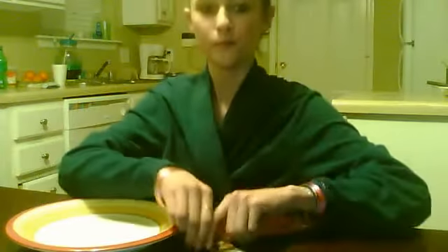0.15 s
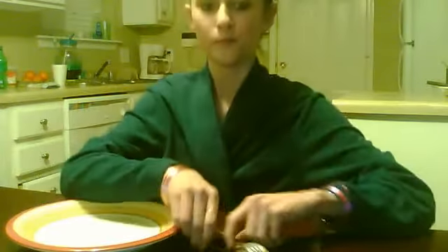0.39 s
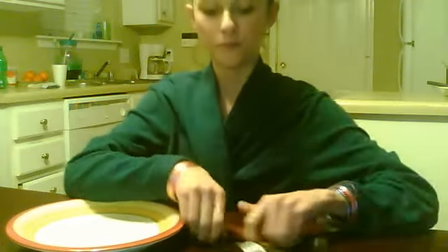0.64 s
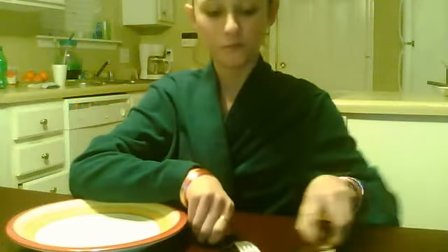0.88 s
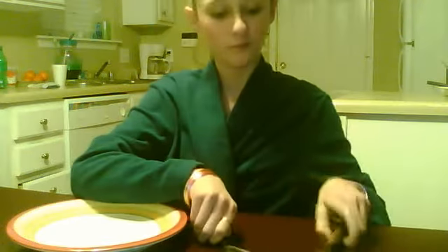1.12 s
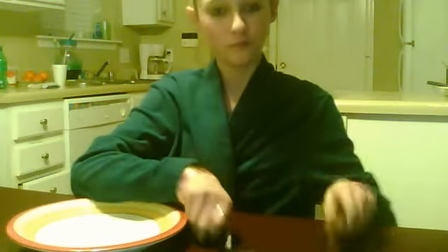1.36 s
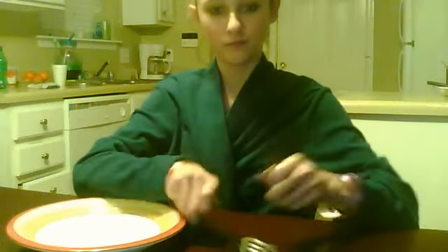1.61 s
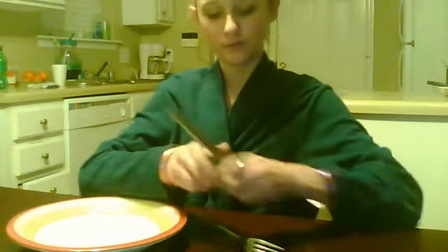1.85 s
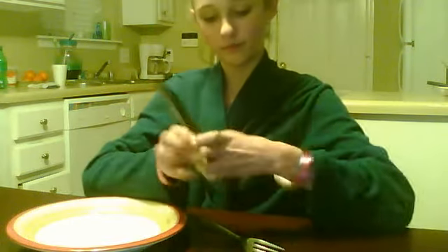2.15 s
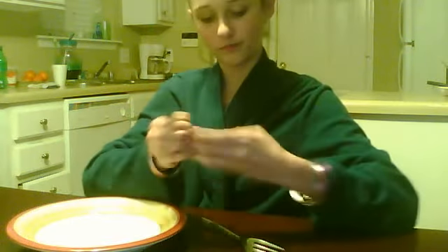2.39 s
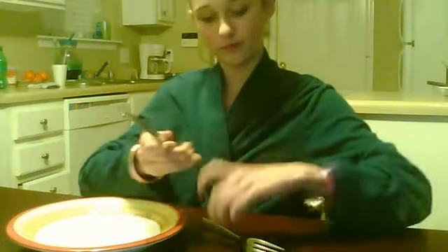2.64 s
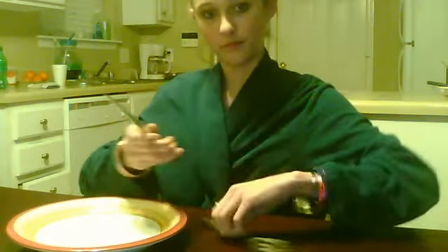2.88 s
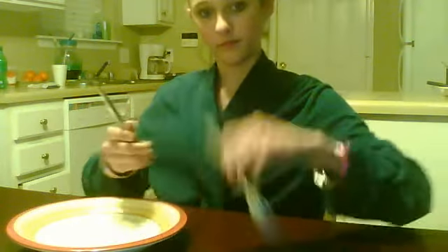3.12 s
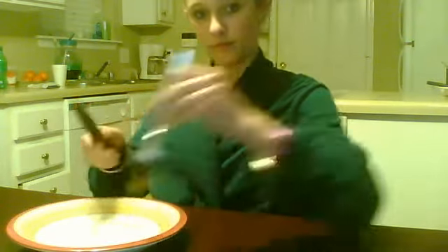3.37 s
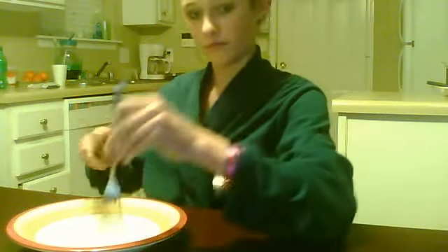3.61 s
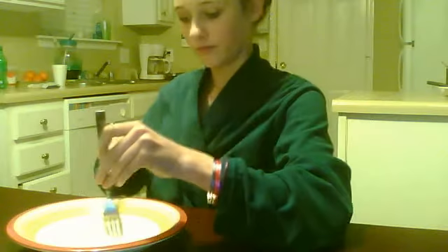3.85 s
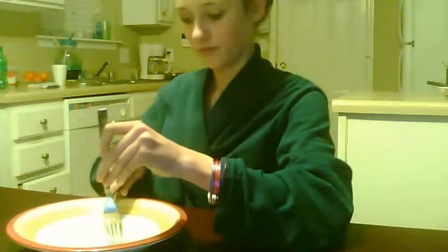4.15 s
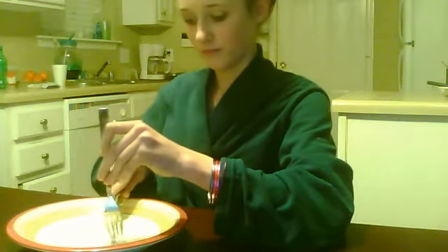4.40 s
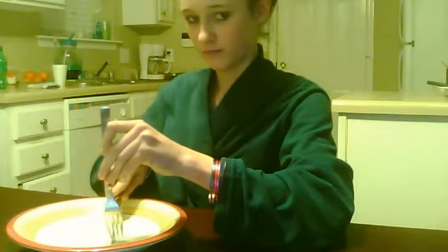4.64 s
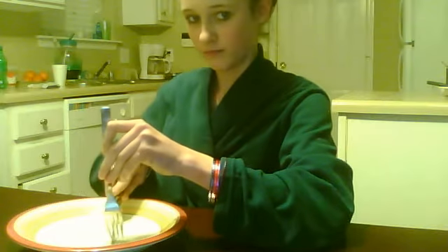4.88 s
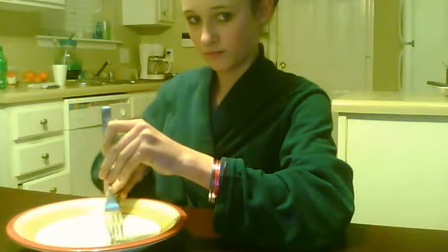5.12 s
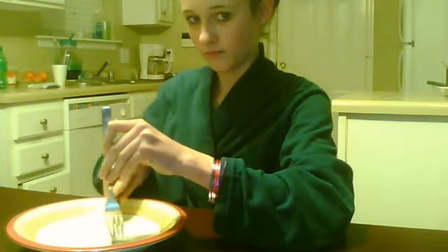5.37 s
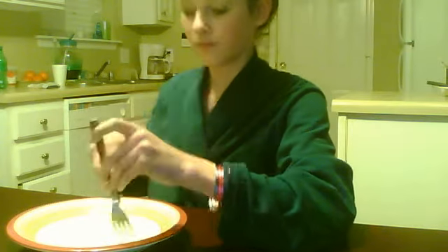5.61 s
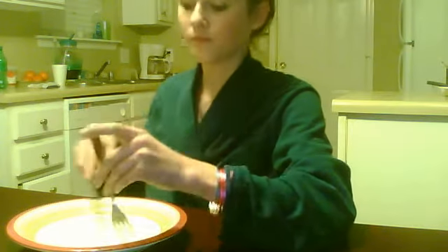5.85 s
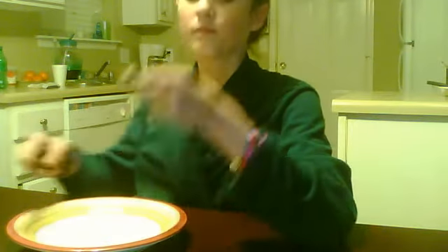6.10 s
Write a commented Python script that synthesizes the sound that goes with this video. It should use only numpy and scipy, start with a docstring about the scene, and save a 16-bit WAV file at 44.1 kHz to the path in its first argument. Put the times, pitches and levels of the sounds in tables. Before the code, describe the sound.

Cutlery shuffles, drops and drags loudly on a wooden kitchen table, then a fork lightly taps and squeaks on a ceramic bowl.

```python
"""Over a faint appliance hum, cutlery is shuffled, dropped and dragged on a wooden kitchen table;
then a fork taps and rubs a ceramic bowl. Impacts combine noise bursts in bands with decaying modes of
wood, steel and bowl. Random slips drive the rubbing sounds, and glided rough tones make the squeals.
The kitchen echo is a convolution with noise that dies away band by band."""
import sys
import numpy as np
from scipy import signal
from scipy.fft import rfft, irfft
from scipy.io import wavfile

SR = 44100
rng = np.random.default_rng(int(sys.argv[2]) if len(sys.argv) > 2 else 0)


def waveform_to_disk(signal):
    """Save audio, clipped to [-1, 1], as 16-bit WAV at the path in sys.argv[1]."""
    frames = np.transpose(np.atleast_2d(signal))
    scaled = np.clip(frames, -1, 1) * 32767
    samples = np.round(scaled).astype(np.int16)
    wavfile.write(sys.argv[1], SR, samples)


def nominal_scale(level):
    """Amplitude ratio for a level in decibels (scalar or array-like)."""
    x = np.asarray(level, float) / 20
    return 10 ** x


N = 275625  # length in samples


def rms_one(x):
    """Normalisation: scales a signal to rms 1."""
    return x / np.sqrt(np.mean(np.abs(x) ** 2) + 1e-20)


def at_hz(points, hz):
    """Interpolation of a spectrum on a log-frequency axis."""
    table_hz, value = np.transpose(points)
    return np.interp(np.log(hz), np.log(table_hz), value)


def band(x, low_hz, high_hz):
    """Band-pass filtering: keeps the range between two frequencies."""
    return signal.sosfilt(signal.butter(2, [low_hz, high_hz], "band", fs=SR, output="sos"), x + 1e-18)


def band_twice(x, low_hz, high_hz):
    """Cascaded filtering: a second pass steepens the skirts of the band."""
    return band(band(x, low_hz, high_hz), low_hz, high_hz)


def dull(x, cut_hz):
    """Soft contact excites little treble: a steep low-pass."""
    return signal.sosfilt(signal.butter(4, cut_hz, fs=SR, output="sos"), x + 1e-18)


def die_away(x, t60):
    """Exponential decay: each impulse falls by 60 dB in t60 seconds."""
    return signal.lfilter([1], [1, -nominal_scale(-60 / (t60 * SR))], x + 1e-18)


def ring(clicks, hz, t60):
    """Damped resonance: a unit click sets a decaying sine of initial height 1 ringing."""
    radius, angle = nominal_scale(-60 / (t60 * SR)), 2 * np.pi * hz / SR
    return signal.lfilter([0, np.sin(angle)], [1, -2 * radius * np.cos(angle), radius ** 2], clicks + 1e-18)


def strike(modes, times, blow_db, spread_db):
    """Modal excitation: every blow strikes every mode with a strength and sign of its own."""
    at, out = np.round(times * SR).astype(int), np.zeros(N)
    chance = rng.standard_normal((len(at), 2, len(modes)))
    for k, (hz, mode_db, t60) in enumerate(modes):
        strength = nominal_scale(blow_db + mode_db + spread_db * chance[:, 0, k])
        clicks = np.zeros(N)
        clicks[at] = strength * np.sign(chance[:, 1, k])
        out += ring(clicks, hz, t60)
    return out


def grains(per_s, uneven_db):
    """Dry friction: random tiny slips of uneven size, at rms 1."""
    sizes = nominal_scale(uneven_db * np.minimum(rng.exponential(1, N), 4)) * rng.choice([-1, 1], N)
    return rms_one(sizes * (rng.random(N) < per_s / SR))


def rubbed(modes, slips, damping):
    """Friction-driven resonance: contact scales the ring time by damping; unit rms gain on noise."""
    def resonate(x):
        return sum(nominal_scale(db) * ring(x, hz, t60 * damping) for hz, db, t60 in modes)

    return resonate(slips) / np.std(resonate(rng.standard_normal(SR // 2)))


def cracks(times, level_db, low_hz, high_hz, t60, click_db=-15.0):
    """Contact impulse: a click and a dying puff of noise, limited to a band."""
    at, clicks, puffs = np.round(times * SR).astype(int), np.zeros(N), np.zeros(N)
    clicks[at], puffs[at] = nominal_scale(level_db + click_db), nominal_scale(level_db)
    noise = die_away(puffs, t60) * rng.standard_normal(N)
    width = 2 * (high_hz - low_hz) / SR  # share of the spectrum, so that level does not follow bandwidth
    burst = clicks / width + 0.557 * noise / np.sqrt(width)
    return dull(band_twice(burst, low_hz, high_hz), 1.4 * high_hz)


def strokes(start, end, first_db, last_db, attack_s, release_s):
    """Amplitude envelope in dB: each stroke rises 40 dB, glides from first to last level, falls 40 dB."""
    t = np.arange(N) / SR
    levels = [np.interp(t, [a - attack_s, a, b, b + release_s], [u - 40, u, v, v - 40], -150, -150)
              for a, b, u, v in zip(start, end, first_db, last_db)]
    return np.max(levels, axis=0)


# spectrum shape of the room air: pitch_hz [Hz], level_db [dB per Hz, relative]
AIR = [(12, -19), (20, 3.5), (64, -10), (129, -12.5), (159, -5), (213, -14.5), (250, -9), (486, -17.5),
       (687, -19), (805, -19.5), (1700, -27), (1990, -33), (2210, -35), (7930, -40), (11500, -52),
       (15000, -82), (22000, -120)]
# appliance tones: pitch_hz [Hz], level_db [dB rms]
HUM = [(161.5, -78), (263.8, -83), (479.1, -80.5), (791.3, -77), (963.6, -82.5), (1206, -84), (1927, -83),
       (2568, -91.5), (3214, -92), (3531, -86.5), (3854, -89.5), (8000, -92)]


def room_tone():
    """Stationary noise and tones: coloured air noise and slightly wavering appliance tones."""
    hz = np.maximum(np.arange(N // 2 + 1) * SR / N, 1)
    air = irfft(rfft(rng.standard_normal(N)) * nominal_scale(at_hz(AIR, hz)), N)
    out = nominal_scale(-61) * rms_one(air)
    for tone_hz, db in HUM:
        wander = np.cumsum(rng.standard_normal(N)) * 0.012  # random walk of phase, radians
        out += np.sqrt(2) * nominal_scale(db) * np.sin(2 * np.pi * tone_hz * np.arange(N) / SR + wander)
    return out


# cutlery landing on the table: start_s [s], level_db [dB], and relative to it
# edge_db (hardness) [dB], glint_db (steel) [dB], hollow_db (hollow ring) [dB]
LANDINGS = [(0.02, -38, -25, -33, -12.5), (0.035, -47.5, -8, -16, -16), (0.04, -34.5, -21, -31, -4.5),
            (0.066, -24.5, -16.5, -29.5, -11.5), (0.116, -25, -17, -28.5, -17), (0.127, -30.5, -9, -30, -8),
            (0.173, -30.5, -20, -23.5, -11), (0.218, -37.5, -19, -26, -6), (0.251, -37, -22, -27, -8),
            (0.274, -27, -13.5, -20.5, -21), (0.33, -34, -28.5, -41, -0.5), (0.415, -45, -29, -24, -1),
            (0.444, -32, -16, -33, -9), (0.46, -19, -18.5, -42, -15.5), (0.532, -33.5, -34, -30.5, -3),
            (0.59, -41, -20, -31, -6), (0.659, -33, -26.5, -35.5, -1), (0.724, -41.5, -25, -29, -11),
            (0.748, -39, -25, -34, 0), (0.78, -41, -27.5, -41, 3), (0.789, -39.5, -29, -44, 1.5),
            (0.804, -35, -27.5, -32, -3.5), (0.811, -40, -25, -52, -1), (0.959, -27.5, -17, -55, -14.5),
            (0.966, -32, -25.5, -53.5, -12), (1.056, -22.5, -11, -42, -13), (1.063, -16, -10.5, -31, -16),
            (1.072, -6, -2.5, -42, -18.5), (1.09, -11.5, -9.5, -47.5, -21), (1.113, -17.5, -14, -46, -18),
            (1.385, -13.5, -14, -40.5, -21), (1.409, -25, -8.5, -44.5, -16.5), (1.425, -21, -6, -45, -16.5),
            (1.439, -25.5, -6, -46, -20), (1.454, -26, -6.5, -37, -18), (1.464, -31, -2.5, -36.5, -16),
            (1.484, -8.5, -2, -32.5, -13.5), (1.501, -11, -2.5, -39.5, -9.5),
            (1.518, -17.5, -3, -40.5, -15), (1.531, -21, -4, -39.5, -9), (1.554, -18, -10, -39.5, -10),
            (1.567, -19.5, -9, -20.5, -12), (1.578, -24, -10, -28, -8.5), (1.603, -9, -5, -41, -27),
            (1.618, -21, -8, -36, -19.5), (1.64, -14, -7, -36, -32), (1.653, -24, -9, -36, -19),
            (1.678, -26, -4, -30, -8), (1.691, -23, -3, -23.5, -25), (1.704, -21, -10, -43, -13),
            (1.739, -27, -6, -36, -19), (1.751, -31, -2, -25, -9), (1.778, -28, -9.5, -29, -9),
            (1.813, -32, -10, -34, -7), (3.018, -42.5, -10, -25, -27.5)]
# cutlery dragged over the wood: start_s [s], end_s [s], first_db [dB], last_db [dB],
# weight_db (boom relative to rub) [dB]
DRAGS = [(0.016, 0.136, -38.5, -31.5, -15.5), (0.164, 0.344, -42.5, -40.5, -22),
         (0.421, 0.65, -40.5, -42, -4), (0.652, 0.73, -37, -41.5, -22.5), (0.763, 0.8, -39, -36, -17.5),
         (0.81, 0.93, -35, -49, -24.5), (1.396, 1.478, -35, -43, -6), (1.544, 1.82, -29.5, -37.5, -14),
         (2.747, 2.896, -42.5, -34, -47)]
# table-top modes: pitch_hz [Hz], level_db [dB], t60_s (free ring) [s]
WOOD = [(523, -20, 0.26), (768, 5, 0.022), (975, -3.5, 0.064), (1107, 3, 0.04), (1237, 1, 0.035),
        (1398.5, -3, 0.081), (1470, -4, 0.06), (1640, -7.5, 0.055), (1950, -21, 0.086),
        (2107, -4.5, 0.02996), (2470, -3, 0.021), (3003, -24.5, 0.025)]
# low modes of the whole table: pitch_hz [Hz], level_db [dB], t60_s (free ring) [s]
BOOM = [(59, -10, 0.18), (110, -1.5, 0.24), (161.5, -6.5, .14), (214, 1.5, 0.15), (321, 4, 0.15)]
# the table's strongest pair of modes: pitch_hz [Hz], level_db [dB], t60_s (free ring) [s]
HOLLOW = [(608, 0, .15), (655, -5, .1)]


def drags():
    """Sliding friction: dense slips drive the wood, and each landing skids briefly."""
    attack_s, release_s = 0.034, 0.037
    skid_db, skid_t60_s = -10, 0.017
    lumps_db, lumps_hz = 3.2, 45  # the drag catches and lets go
    start, end, first, last, weight = np.transpose(DRAGS)
    rub = nominal_scale(strokes(start, end, first, last, attack_s, release_s))
    heavy = nominal_scale(strokes(start, end, first + weight, last + weight, attack_s, release_s))
    s, level = np.transpose(LANDINGS)[:2]
    landed = np.zeros(N)
    landed[np.round(s * SR).astype(int)] = nominal_scale(level + skid_db)
    skid = die_away(landed, skid_t60_s)
    lumps = rms_one(dull(rng.standard_normal(N), lumps_hz))
    grit = nominal_scale(-8 + lumps_db * lumps) * grains(per_s=1800, uneven_db=2.6)
    slips = np.maximum(rub, skid) * grit
    out = dull(rubbed(HOLLOW + WOOD, slips, damping=0.57), cut_hz=2740)
    out += nominal_scale(1.5) * dull(band(slips, low_hz=276, high_hz=1900), cut_hz=1660)
    out += dull(rubbed(BOOM[1:], heavy * grit, damping=1.0), cut_hz=390)
    return out + nominal_scale(-17) * band_twice(slips, low_hz=2431, high_hz=4630)


def knocks():
    """Impact: each landing cracks in four bands and strikes the wood modes."""
    s, level, hard, glint = np.transpose(LANDINGS)[:4]
    s = s + 0.0006  # the contact takes a moment to build
    treble = 9.5 + 0.6 * hard + 0.46 * glint  # the treble follows both edge and glint
    out = cracks(s, level - 5, low_hz=680, high_hz=1840, t60=0.026, click_db=-1.0 + 0.3 * hard)
    out += cracks(s, level + hard + 3.3, low_hz=1800, high_hz=2680, t60=0.018, click_db=-8.5 + 0.24 * hard)
    out += cracks(s, level + treble, low_hz=2600, high_hz=4280, t60=0.034, click_db=-9.0)
    out += cracks(s, level + glint - 1.5, low_hz=4600, high_hz=7800, t60=0.13, click_db=-16.5)
    # a soft landing puts more of its push into the wood
    return out + dull(strike(WOOD, s, level - 19 - 0.311 * hard, spread_db=4.5), cut_hz=2320)


def boom():
    """Low plate modes: each landing sets the whole table booming."""
    s, level = np.transpose(LANDINGS)[:2]
    blow = -31.5 + 0.62 * level  # the boom grows more slowly than the crack
    return dull(strike(BOOM, s, blow, spread_db=5.5), cut_hz=1700)


def hollow():
    """Modal excitation: each landing wakes the table's strongest pair of modes by a share of its own."""
    s, level, _, _, share = np.transpose(LANDINGS)
    return dull(strike(HOLLOW, s, level + share, spread_db=2), cut_hz=900)


# kitchen decay: pitch_hz [Hz], t60_s [s]
ECHO = [(100, 0.53), (1000, 0.5), (2000, 0.53), (3000, 0.47), (5000, 0.36), (9000, 0.18)]


def kitchen(x):
    """Reverberation: convolution with unit-energy noise dying away band by band after a brief build-up."""
    t, edges = np.arange(SR) / SR, 140 * 2 ** np.arange(0, 6.6, 0.5)
    tail = np.zeros(SR)
    for low_hz, high_hz in zip(edges, edges[1:]):
        t60 = at_hz(ECHO, np.sqrt(low_hz * high_hz))
        tail += band(rng.standard_normal(SR), low_hz, high_hz) * nominal_scale(-60 * t / t60)
    tail *= np.clip(t / 0.0031, 0, 1)
    return signal.fftconvolve(x, tail / np.sqrt(np.sum(tail ** 2)))[:N]


# short modes of tines and blade: pitch_hz [Hz], level_db [dB], t60_s [s]
TINES = [(2750, 4, 0.045), (3500, -0.5, 0.035), (4400, -6, 0.17), (4740, -6, 0.3), (5200, 0, .06),
         (5780, -3, .1), (6450, -1.5, .04)]
# steel clinking on steel: start_s [s], level_db [dB], pitch_hz (favoured) [Hz]
CLINKS = [(0.034, -47, 3500), (0.068, -52, 6450), (0.173, -48, 6450), (0.205, -56, 5780),
          (0.235, -61, 4400), (0.276, -58, 4400), (0.446, -47, 2750), (1.385, -52, 4740),
          (1.507, -52, 5780), (1.567, -46.5, 5200), (1.6, -47, 4740), (3.019, -59, 5200)]


def clinks():
    """Selective modal excitation: each clink rings the steel mostly near its favoured pitch."""
    s, blow, favoured = np.transpose(CLINKS)
    out = np.zeros(N)
    for mode in TINES:
        octaves_off = np.abs(np.log2(mode[0] / favoured))
        out += strike([mode], s, blow - 130 * octaves_off, spread_db=1)  # 130 dB per octave
    return out


# modes of the dropped knife: pitch_hz [Hz], level_db [dB], t60_s (before settling) [s]
KNIFE = [(1034, -22, .8), (1244, -12, .25), (1771, -18, .6), (1897, 0, 1.3), (2067, -17, .4),
         (2110, -19, .4)]
# the drop: start_s [s], level_db [dB], settle_s (time at which it settles on the wood) [s]
KNIFE_DROP = (1.0918, -32, 1.22)
# modes of the dragged fork: pitch_hz [Hz], level_db [dB], t60_s [s]
FORK = [(727, -6, .25), (950, -5, .9), (964, -7, .9), (1276, -8, .9), (1410, -4, .3), (1787, -10, .4),
        (1911, -4, .7)]
# the fork leaves the wood: start_s [s], level_db [dB]
FORK_LIFT = (1.74, -43)


def steel():
    """Bar modes and contact damping: the knife rings until it settles; the fork rings on as it lifts."""
    s, blow, settles = KNIFE_DROP
    flat_s = np.maximum(np.arange(N) / SR - settles, 0)
    settling = nominal_scale(-280 * flat_s)  # damping once the knife lies flat, dB per second
    knife = settling * strike(KNIFE, np.array([s]), blow, spread_db=1)
    s, blow = FORK_LIFT
    return dull(knife + strike(FORK, np.array([s]), blow, spread_db=1), cut_hz=3000)


# bands of the hiss: low_hz [Hz], high_hz [Hz], level_db [dB, relative]
EDGE = [(6700, 8300, 0), (9100, 10700, -2), (11770, 12000, -15)]
# blade edge on the varnish: start_s [s], end_s [s], first_db [dB], last_db [dB]
HISS = [(1.509, 1.538, -58, -60.5), (1.564, 1.638, -59.5, -59.5), (1.657, 1.803, -50, -67.5)]


def hiss():
    """Fine friction: the blade edge hisses in several treble bands."""
    fine = grains(per_s=8000, uneven_db=2.5)
    bands = [nominal_scale(db) * band_twice(fine, low_hz, high_hz) for low_hz, high_hz, db in EDGE]
    return nominal_scale(strokes(*np.transpose(HISS), attack_s=0.069, release_s=0.09)) * rms_one(sum(bands))


# the singing edge: start_s [s], end_s [s], first_db [dB], last_db [dB]
WHISTLE = [(1.685, 1.764, -55, -64)]


def whistle():
    """Narrow-band friction: the edge sings near 7.8 kHz."""
    fine = grains(per_s=8000, uneven_db=2.5)
    level = nominal_scale(strokes(*np.transpose(WHISTLE), attack_s=0.069, release_s=0.09))
    return level * rms_one(band_twice(fine, 7770, 7880))


# fork on the bowl: start_s [s], level_db [dB], and relative to it
# boom_db (table) [dB], upper_db (upper ring) [dB], knock_db [dB]
TAPS = [(3.8076, -53.5, 4.5, -2, 2), (3.8351, -55, 6.5, -1.5, -4), (4.008, -41, -14.5, 2, 3),
        (4.1398, -64, -4, -6, 8), (5.284, -70, -5.5, 6.5, 10), (5.386, -62.5, -10, 4, 18),
        (5.565, -52, 4, -3, -6), (5.594, -63, 14.5, 3, -12)]


def taps():
    """Impact through the bowl: each tap knocks and pushes the table."""
    s, level, push, upper, knock = np.transpose(TAPS)
    held = [(hz, db, t60 * 0.9) for hz, db, t60 in BOOM]  # resting forearms shorten the ring
    out = dull(strike(held, s, level + push + 0.94, spread_db=9.0), cut_hz=260)
    out += cracks(s, level + push + 0.25, low_hz=43.0, high_hz=95.0, t60=0.31)  # the table leg thuds
    out += cracks(s, level + knock, low_hz=201, high_hz=2210, t60=0.088)
    return out + cracks(s, level + upper - 12, low_hz=2800, high_hz=8400, t60=0.29, click_db=-18)


# bowl modes: pitch_hz [Hz], level_db [dB], t60_s (free ring) [s]
BOWL = [(1330, -7, 0.7), (1405, 4.5, 0.33), (1370, 2, 0.14), (1740, -8, 0.086), (2108, -8, 0.51),
        (2290, 5.5, 0.38), (2315, -4, 0.61), (2450, 2.5, 0.27), (2550, -6, 0.13), (2680, -17, 0.29),
        (3617, -1, 0.098), (3610, -12.5, 0.31), (5580, -11, 0.1), (5807, -16, 0.31), (6295, -21, 0.26),
        (7200, -11, 0.19), (8680, -15.5, 0.14), (9230, -23, 0.33)]


def bowl_ring():
    """Shell modes: how heavily a tap lands favours some modes; the resting tines make them waver."""
    s, level, push, upper, _ = np.transpose(TAPS)
    low = 0.1 * push  # the rings near 1.4 and 3.6 kHz
    ping = -5 + 0.82 * push  # a heavy landing wakes the rings near 1.7 and 5.8 kHz
    middle = -17 - 0.49 * push  # and damps the middle ring
    groups = [(BOWL[:3], -9.5 + low), (BOWL[3:4], ping), (BOWL[4:8], middle), (BOWL[8:10], -6.5),
              (BOWL[10:12], upper - 3 + low), (BOWL[12:14], upper + ping), (BOWL[14:], upper - 9)]
    out = np.zeros(N)
    for modes, share_db in groups:
        waver = rms_one(dull(rng.standard_normal(N), cut_hz=55))
        out += nominal_scale(4.0 * waver) * strike(modes, s, level + share_db, spread_db=1)
    return out


# tines rubbing the glaze: start_s [s], end_s [s], level_db [dB]
RUB = [(4.14, 4.184, -68), (4.23, 4.546, -79), (4.673, 4.692, -76), (4.84, 4.871, -72), (5.013, 5.05, -72),
       (5.163, 5.276, -72), (5.372, 5.396, -69), (5.428, 5.487, -64)]


def bowl_rub():
    """Sliding friction: the tines excite damped bowl modes and scratch the glaze."""
    start, end, level = np.transpose(RUB)
    rub = strokes(start, end, level, level, attack_s=0.18, release_s=0.12)
    out = rubbed(BOWL, nominal_scale(rub + 3) * grains(per_s=1100, uneven_db=4.0), damping=0.17)
    scratch = rms_one(band(grains(per_s=2500, uneven_db=5.0), low_hz=2880, high_hz=5940))
    return out + nominal_scale(rub - 11.5) * scratch


# a tine sticks and slips: start_s [s], end_s [s], level_db [dB], first_hz [Hz], last_hz [Hz]
SQUEALS = [(4.3, 4.68, -89, 2485, 2608), (4.67, 4.72, -81, 2345, 2310), (4.82, 4.92, -86.5, 2320, 2320),
           (5.0, 5.03, -66, 975, 943), (5.0, 5.08, -77, 2582, 2650), (5.16, 5.3, -74, 2010, 1970),
           (5.17, 5.22, -71.5, 850, 923), (5.22, 5.28, -63.5, 960.6, 1015), (5.2, 5.28, -87, 2316, 2350),
           (5.22, 5.27, -72, 2733, 2610), (5.39, 5.55, -65.5, 2460, 2255), (5.39, 5.52, -69.5, 2187, 2015)]


def squeals():
    """Stick-slip of a tine: narrow-band roughness modulates gliding tones."""
    fade_s, width_hz = 0.07, 40
    parts = [dull(grains(per_s=610, uneven_db=3.5), width_hz) for _ in range(2)]
    rough = rms_one(parts[0] + 1j * parts[1])
    t, out = np.arange(N) / SR, np.zeros(N)
    for k, (start, end, db, first_hz, last_hz) in enumerate(SQUEALS):
        phase = 2 * np.pi * np.cumsum(np.interp(t, [start, end], [first_hz, last_hz])) / SR
        level = nominal_scale(strokes([start], [end], [db], [db], fade_s, fade_s))
        shifted = np.roll(rough, k * SR // 3)  # gives each squeal another stretch of roughness
        out += level * np.sqrt(2) * np.real(shifted * np.exp(1j * phase))
    return out


def scene():
    """Superposition: contacts, echo and room tone; long rings feed the room less than knocks."""
    near = drags() + knocks() + hiss() + whistle() + taps() + bowl_rub() + squeals()
    rings = boom() + clinks() + bowl_ring()
    held = hollow() + steel()
    echo = nominal_scale(-11.5) * kitchen(near + nominal_scale(-4.5) * rings + nominal_scale(-12) * held)
    return (near + rings + held + echo + room_tone())[None]


def low_pass(x):
    """Removes everything above the highest recorded frequency."""
    return signal.sosfilt(signal.butter(12, 12050, fs=SR, output="sos"), x)


def record(dry):
    """Saturation and band limiting: peaks are rounded, then the treble is cut."""
    rounded = 0.75 * np.tanh(dry / 0.75)
    mix = signal.sosfilt(signal.butter(6, 11800, fs=SR, output="sos"), rounded)
    return low_pass(mix)


dry = scene()
out = record(dry)
waveform_to_disk(out)
```